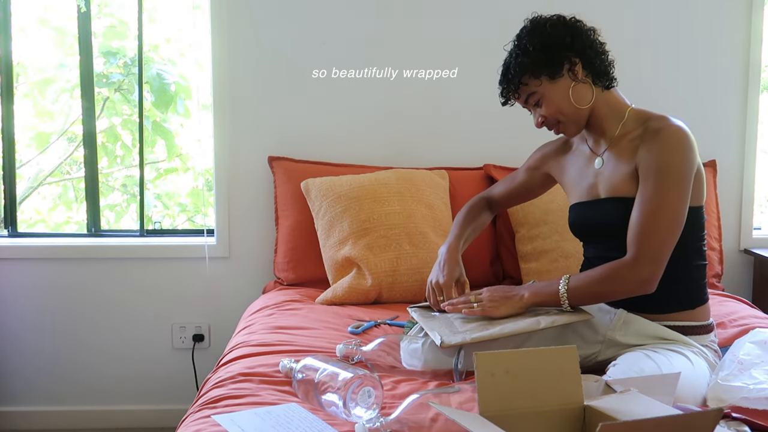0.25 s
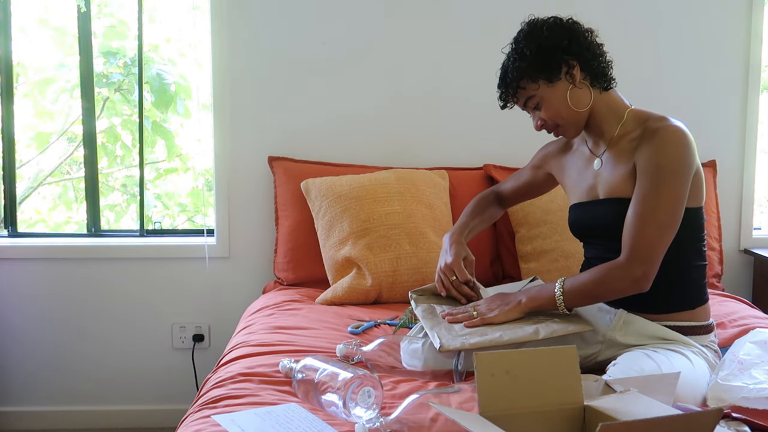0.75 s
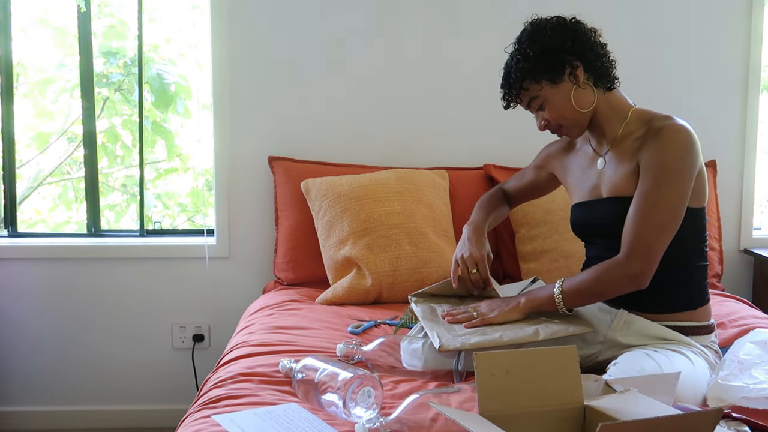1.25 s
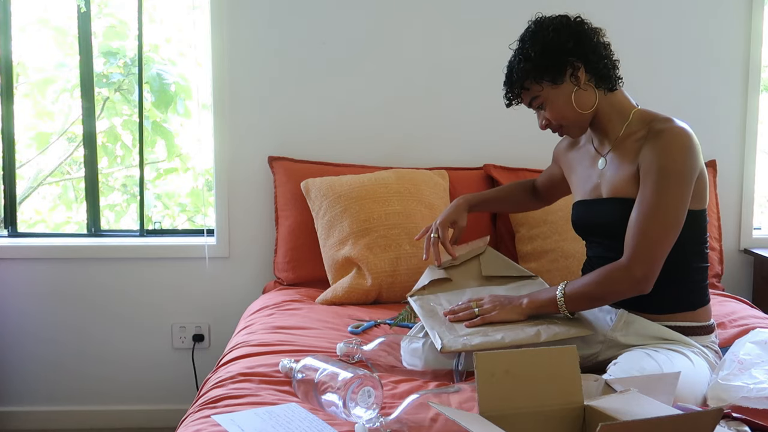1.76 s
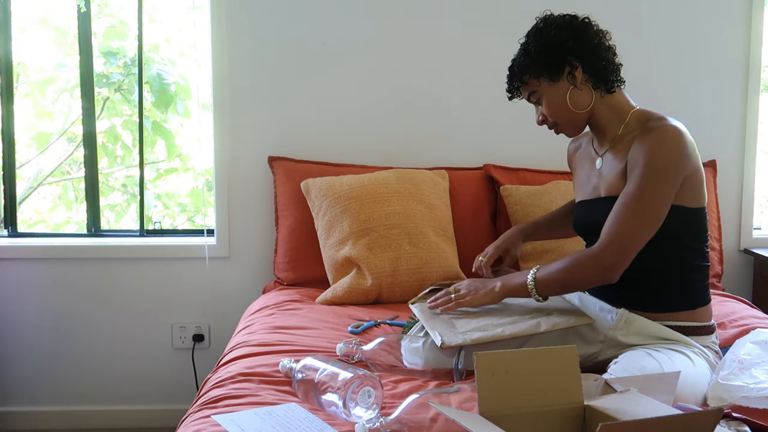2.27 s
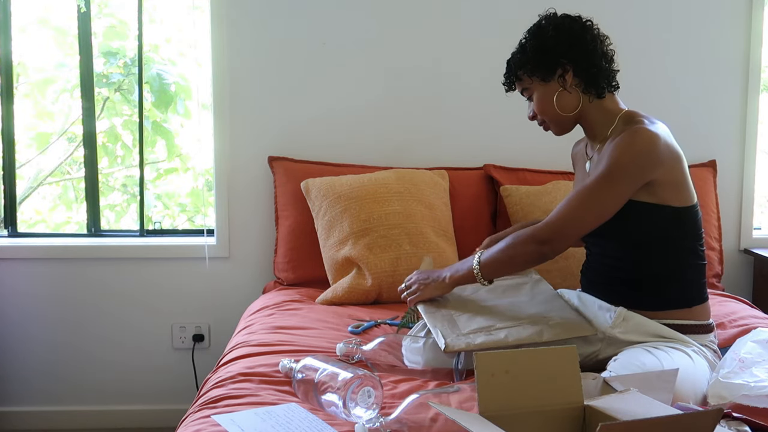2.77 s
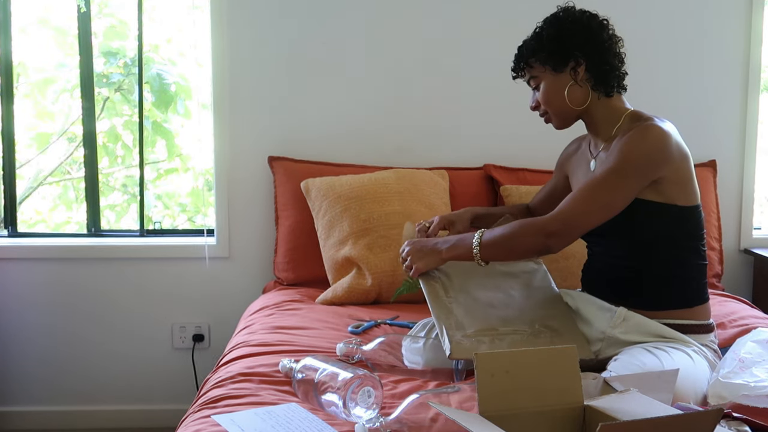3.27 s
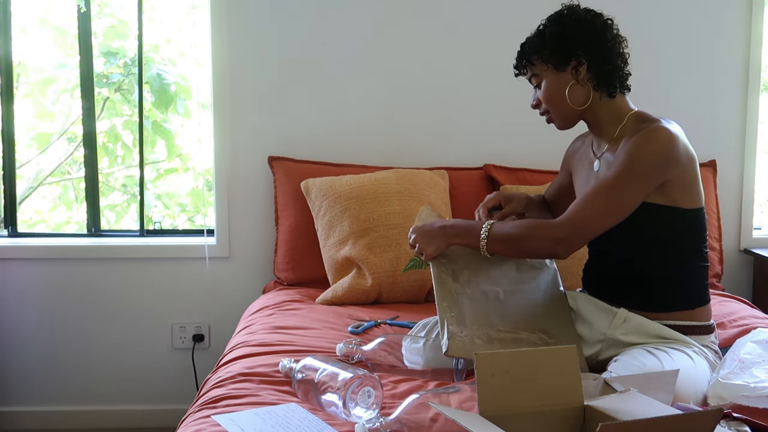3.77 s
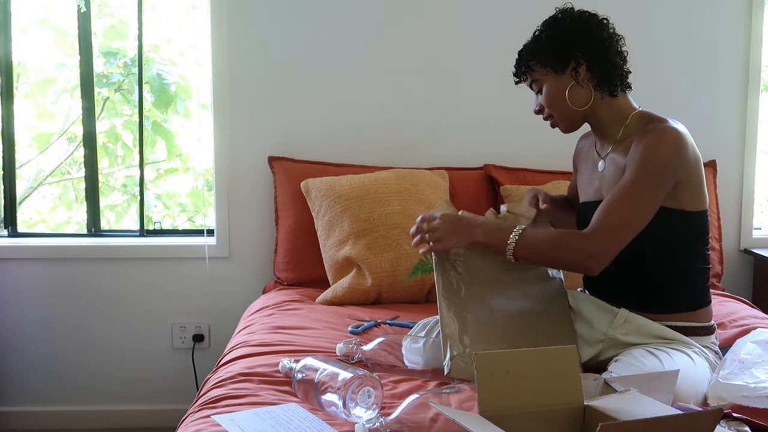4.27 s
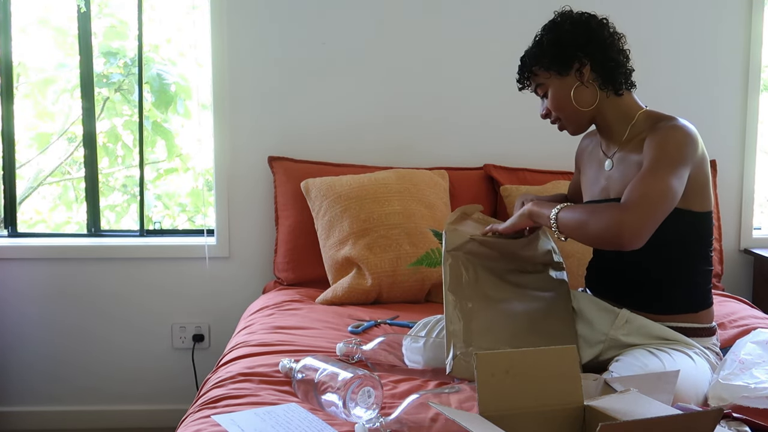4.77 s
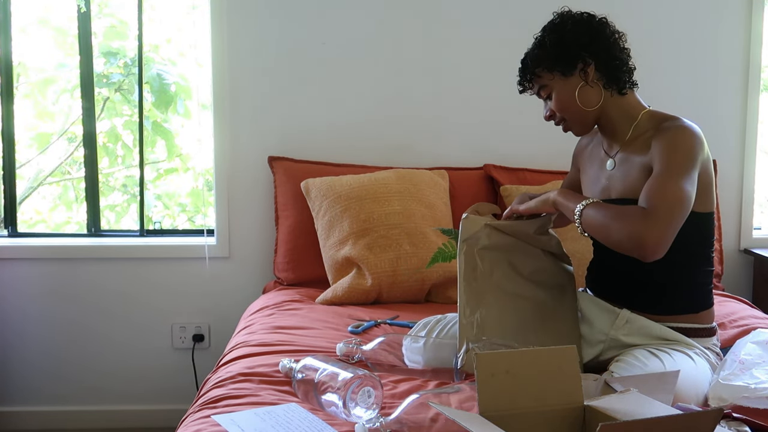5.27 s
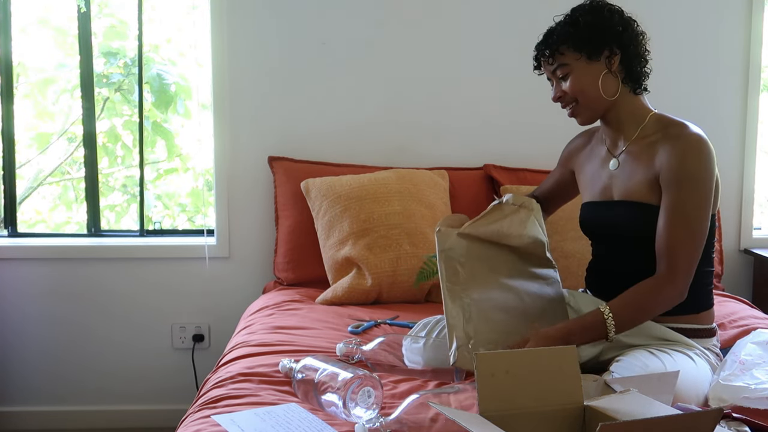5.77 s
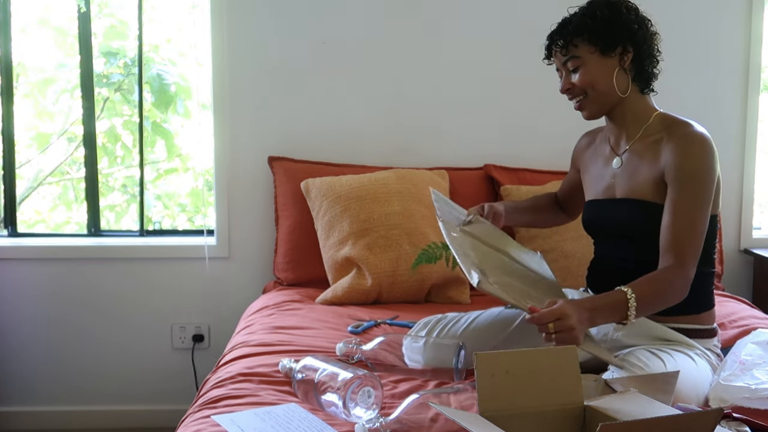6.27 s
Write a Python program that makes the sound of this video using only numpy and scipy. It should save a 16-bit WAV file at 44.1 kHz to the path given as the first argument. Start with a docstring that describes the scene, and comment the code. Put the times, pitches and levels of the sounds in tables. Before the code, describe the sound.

A heavy paper parcel is handled close by: dull pressing, sharp crease snaps, soft flaps and hollow thumps, with a faint room hum.

```python
"""Hands unwrap a parcel of thick paper on a bed in a small bare-walled bedroom with a faint hum.
First a dull pressing rumble under sliding paper and snapping creases; from 1.35 s hollow notes and flaps.
A sparser stretch from 2 to 3.4 s, then dense creasing to 5.3 s with one squeak at 4.7 s; last stroke at 6.2 s.
Paper is swarms of short rings, bending is noise pops, notes are wavering sines, the room is noise echoes."""
import sys
import numpy as np
from scipy import signal
from scipy.fft import rfft, irfft
from scipy.io import wavfile
from scipy.ndimage import uniform_filter1d

SR = 44100
rng = np.random.default_rng(int(sys.argv[2]) if len(sys.argv) > 2 else 0)


def wav_record(signal):
    """Record a signal, one row per channel, as 16-bit PCM in the file named by sys.argv[1]."""
    frames = np.transpose(np.atleast_2d(signal))
    bounded = np.clip(frames, -1, 1)
    # unit amplitude maps onto the largest positive 16-bit level
    quanta = np.round(bounded * 32767).astype(np.int16)
    wavfile.write(sys.argv[1], SR, quanta)


N = 287946
TIME = np.arange(N) / SR

# clearest single creases giving way:
# [t/s, level/dB, ring f/Hz, small snaps that follow re level/dB, treble tick before trim/dB]
CREASE_SNAPS = [(0.01, -21, 1870, -13, -36), (0.1498, -15.5, 2380, -6.5, -28), (0.218, -34, 2430, -13, -50),
                (0.2427, -16.5, 3120, -7.5, -40), (.3546, -29, 1660, -5, -48), (.422, -22, 1980, -5, -46),
                (.471, -14.5, 2200, -15, -48), (.52, -16.5, 2540, -1, -39),
                (0.5475, -15.5, 2070, -1.5, -36), (0.6948, -13.5, 1550, -13, -37),
                (.718, -11, 1700, -14, -43), (.784, -17, 1900, -12, -46), (0.843, -12, 4200, -7, -44),
                (0.8947, -19, 2560, -11, -44), (0.9796, -9, 2350, -13, -36), (.993, -13, 2010, -6, -36),
                (1.016, -14, 1900, -11, -44), (1.061, -8, 3000, -14.5, -52), (1.182, -12.5, 3270, -7, -53),
                (1.1852, -14, 2340, -8.5, -52), (1.321, -16, 2040, -15, -47), (1.4689, -9, 2060, 2, -27),
                (1.478, -1.5, 2100, -14, -42), (1.6345, -13.5, 2700, -11, -50),
                (1.657, -10, 1830, -7.5, -49), (1.801, -22, 1940, -8, -48), (2.064, -20.5, 2560, -20, -60),
                (2.1595, -27, 2800, -13, -53), (2.223, -16, 2800, -8.5, -50), (2.252, -19, 2100, -15, -50),
                (2.4044, -20, 2660, -15, -52), (2.489, -24, 2500, -2, -48), (2.5633, -20, 3000, -7, -48),
                (2.6913, -25, 3020, -8, -50), (2.8855, -23, 2260, -9, -55), (3.016, -27, 1830, -6, -50),
                (3.407, -25, 2540, -5, -28), (3.4839, -13.5, 2100, -17, -50),
                (3.5513, -19.5, 1850, -1.5, -44), (3.605, -12, 2830, -4, -47), (3.633, -10, 2280, -7, -49),
                (3.7266, -11, 3000, -4, -35), (3.8048, -16, 1930, -7, -46), (3.9531, -7.5, 3080, -8, -39),
                (4.0444, -12.5, 3230, -9, -53), (4.1084, -9, 3020, -7, -46), (4.292, -3, 2840, -19, -24),
                (4.2986, -7.5, 3300, -4, -30), (4.324, -8, 3140, -5, -44), (4.341, -7, 2880, -7, -42),
                (4.512, -19, 2340, 0.5, -46), (4.584, -10.5, 1500, -6, -35), (4.5949, -9, 1900, -7, -33),
                (4.8018, -11.5, 2280, -2, -25), (4.867, -8, 3230, -5, -44), (4.8876, -3, 2100, -7.5, -35),
                (4.919, -8, 2510, -13, -40), (4.967, -15, 2210, -4, -50), (4.984, -10, 2400, -11, -44),
                (4.994, -12, 2550, -9, -44), (5.008, -8, 2640, -15, -41), (5.02, -8.5, 1340, -7, -46),
                (5.205, -14.5, 2030, -21, -52), (5.247, -15, 1730, -12, -58), (5.288, -5, 2640, -15, -38),
                (5.46, -20.5, 2190, 4, -30), (5.549, -21, 2900, 0.5, -48), (5.589, -18, 2560, -19, -50),
                (5.774, -23, 2310, -10, -54), (5.883, -22.5, 2190, -6, -55), (5.952, -18, 2400, -9, -49),
                (6.023, -19.5, 2810, -7, -40), (6.232, -10.5, 2290, -8, -40), (6.507, -25, 4550, -5, -43)]
# spectrum of creasing, relative: [f/Hz, level/dB per Hz]
CREASE_SPECTRUM = [(300, -18), (700, -13), (1200, -7), (1700, -5.5), (2400, -0.5), (3200, -2), (4500, -5),
                   (6500, -9.5), (9000, -17), (12500, -24.5), (15500, -60)]


def amp(db):
    """Decibels to gain."""
    return 10 ** (np.asarray(db) / 20)


def unit(x):
    """Scales to rms 1."""
    return x / np.sqrt(np.mean(x ** 2) + 1e-20)


def curve(rows, axis=1):
    """One column of a time table, interpolated at every sample."""
    rows = np.array(rows)
    return np.interp(TIME, rows[:, 0], rows[:, axis])


def read(points, hz):
    """A spectrum table, interpolated on a log-frequency axis."""
    f, value = np.transpose(points)
    return np.interp(np.log(hz + 1), np.log(f + 1), value)


def add(mix, s, sound):
    """Mixes a sound in, in place, at time s."""
    part = mix[max(round(s * SR), 0):][:len(sound)]
    part += sound[:len(part)]


def lowpass_noise(hz, size):
    """Random wander of rms 1, low-passed at hz."""
    sos = signal.butter(2, hz, fs=SR, output="sos")
    return unit(signal.sosfilt(sos, rng.standard_normal(size)))


def colour(x, spectrum, size=4096):
    """Causal minimum-phase filter of unit energy with the given spectrum."""
    hz = abs(np.fft.fftfreq(size, 1 / SR))
    log_gain = np.log(amp(read(spectrum, hz)))
    response = np.exp(np.conj(signal.hilbert(log_gain)))
    taps = np.fft.ifft(response).real[:size // 2]
    return signal.oaconvolve(x, taps / np.linalg.norm(taps))[:len(x)]


def shelf(x, hz, db):
    """Changes the level above hz by a curve of dB."""
    top = signal.sosfiltfilt(signal.butter(2, hz, "high", fs=SR, output="sos"), x)
    return x + top * (amp(db) - 1)


def effort(lead_s=0):
    """Gains of crinkle, treble and bending: strokes build, hold and let go on top of a steady rustle."""
    # each push, pull or fold: [t at full strength before lead/s, build-up/s, hold/s, let-go/s,
    # crinkle/dB, treble re crinkle/dB, bending/dB]
    strokes = [(0.005, 0.012, 0.03, 0.035, -30, -16.5, -46), (0.156, .008, .005, 0.036, -34.5, -14, -58),
               (0.244, 0.023, .005, 0.041, -39.5, -11, -68),
               (0.363, 0.0076, 0.0054, 0.024, -35.5, -16, -55),
               (0.435, 0.017, 0.026, 0.02, -29.5, -16.5, -45.5),
               (0.559, 0.034, 0.023, 0.051, -28.5, -17, -48), (0.702, 0.022, 0.056, 0.15, -30, -13.5, -44),
               (0.978, 0.16, 0.028, 0.027, -28, -16, -40.5), (1.325, 0.028, 0.11, 0.048, -28, -13, -44),
               (1.463, 0.023, 0.015, 0.018, -25, -6, -31.5),
               (1.671, 0.016, 0.015, 0.041, -36, -11.5, -34.5),
               (1.849, 0.022, 0.023, 0.027, -41, -13.5, -42), (2.072, .008, .005, 0.025, -43.5, -25, -62),
               (2.166, 0.0034, .003, 0.023, -37.5, -25, -60),
               (2.226, 0.0045, 0.06, 0.084, -35.5, -11.5, -44),
               (2.363, .008, .012, 0.027, -38.5, -7.5, -58), (2.493, 0.0088, .016, 0.045, -40, -9, -44),
               (2.567, .006, .045, 0.075, -37, -12.5, -45), (2.696, .008, 0.013, 0.025, -37.5, -8.5, -45),
               (2.748, .008, 0.0088, 0.012, -37.5, -14, -57), (3.036, 0.013, 0.016, 0.17, -37, -12, -45.5),
               (3.347, 0.024, 0.011, 0.015, -44.5, -2, -43), (3.471, 0.033, 0.0089, 0.014, -28, -12, -40),
               (3.61, 0.053, 0.018, 0.025, -29.5, -12.5, -36.5),
               (3.726, 0.004, 0.004, 0.013, -33.5, 3.5, -38),
               (3.847, 0.12, 0.013, 0.045, -26.5, -10, -34.5),
               (3.956, 0.039, .005, 0.042, -26.5, -12.5, -38.5), (4.1, 0.047, 0.014, 0.046, -31, -14, -55),
               (4.206, 0.029, 0.0046, 0.022, -30.5, -16.5, -36),
               (4.293, 0.0073, 0.047, 0.056, -31, -25, -33), (4.381, 0.028, 0.015, 0.019, -25, -13.5, -35),
               (4.591, 0.0092, 0.02, 0.033, -26.5, -18, -35), (4.703, .025, 0.021, 0.1, -32, -11.5, -40.5),
               (4.805, 0.026, 0.013, 0.025, -25, -12.5, -31),
               (4.896, 0.014, 0.014, 0.039, -24.5, -9.5, -29.5),
               (5.013, 0.029, 0.0063, 0.027, -20.5, -14, -30.5),
               (5.116, 0.029, 0.029, 0.071, -35, -10, -40), (5.286, 0.011, 0.015, 0.042, -26, -9, -39),
               (5.446, 0.018, .015, 0.042, -34, -24, -43), (5.633, 0.065, 0.019, 0.044, -34, -11.5, -42.5),
               (5.878, .004, .004, 0.013, -52, -18, -47), (5.984, 0.024, 0.055, 0.037, -38, -10, -56),
               (6.212, 0.034, 0.017, 0.091, -22.5, -15, -35)]
    # parcel held and turned between strokes: [t/s, crinkle/dB, bending/dB]
    holding = [(0, -41, -51), (.33, -45.5, -65), (.52, -54, -58), (1.05, -38.5, -43.5), (1.25, -39, -50),
               (1.55, -35.5, -49), (1.62, -39.5, -45.5), (1.79, -43, -54), (2.12, -55, -56.5),
               (2.5, -41, -51), (2.86, -48, -54.5), (3.17, -38.5, -47), (4.0, -36, -45), (4.5, -35.5, -44),
               (5.05, -36, -42.5), (5.7, -36, -44), (5.93, -51, -55.5), (6.3, -56, -56), (6.53, -38, -54)]
    holding_treble_db = -15  # re crinkle

    crinkle, bending = (amp(curve(holding, axis=k)) ** 2 for k in (1, 2))
    treble = crinkle * amp(holding_treble_db) ** 2
    t = TIME + lead_s
    for s, build_s, hold_s, let_go_s, db, sharp_db, bend_db in strokes:
        before = np.maximum(s - t, 0) / build_s
        after = np.maximum(t - s - hold_s, 0) / let_go_s
        power = np.exp(-2 * np.minimum(before + after, 20))
        crinkle = crinkle + power * amp(db) ** 2
        treble = treble + power * amp(db + sharp_db) ** 2
        bending = bending + power * amp(bend_db) ** 2
    return np.sqrt([crinkle, treble, bending])


def ring(hz, cycles, size=500):
    """A facet of paper swells within a cycle, then decays by 1/e every `cycles` cycles."""
    turns = hz * np.arange(size) / SR
    return np.sin(2 * np.pi * turns) * np.exp(-turns / cycles) * (1 - np.exp(-2 * turns))


def clumps(spread_db, per_s):
    """Random gain: snaps come in little avalanches."""
    return amp(spread_db * lowpass_noise(per_s, N))


def crackle(per_s, spread_db, cycles, wander_db, wander_per_s, count=36, order=4):
    """A white swarm of snaps, many small and few large, on facets that get busy in groups of like size."""
    sizes = amp(spread_db * np.minimum(rng.exponential(1, N), 3.6)) * rng.choice([-1, 1], N)
    clicks = sizes * (rng.random(N) < per_s / SR)
    facet = rng.integers(0, count, N)
    busy = [clumps(wander_db, wander_per_s) for _ in range(count // order)]
    out = np.zeros(N)
    for k, hz in enumerate(np.geomspace(500, 15000, count)):
        struck = clicks * (facet == k) * busy[k // order]
        out += signal.oaconvolve(struck, ring(hz, cycles) * hz)[:N]
    # evens out the swarm's level over about 40 ms, so no random burst sticks out
    power = uniform_filter1d(uniform_filter1d(out ** 2, size=1500), size=700)
    return out / np.sqrt(abs(power) + 0.0011 * power.mean())


def sticking(depth_db, hold_s):
    """Gain dip just before a crease gives way, as the paper holds still under tension."""
    held = np.zeros(N)
    for s, *_ in CREASE_SNAPS:
        held = np.maximum(held, np.exp(-abs(s - TIME) / hold_s) * (TIME < s))
    return amp(depth_db * held)


def rustle(crinkle, treble, crease_db, slide_db, treble_db):
    """Coarse creasing and fine sliding share the work; taut paper and tight creases are brighter."""
    # paper sliding flat on paper rather than creasing: [t/s, power share 0-1]
    slide_share = [(0, 0.65), (.25, 0.06), (.45, 0.56), (.75, 0.75), (1.0, 0.9), (1.2, 0.48), (1.4, 0.16),
                   (2.1, 0.24), (4.4, 0.12), (4.7, 0.26), (5.4, 0.08), (5.9, 0.15), (6.2, 0.18),
                   (6.5, 0.12)]
    # tension in the sheet: [t/s, treble re bass/dB]
    tension = [(0, 0), (.7, 1), (1.2, 1.5), (1.47, -2), (1.6, -5.5), (2.1, 4), (2.35, 1), (3.1, 1),
               (3.8, -1.5), (4.35, -0.5), (4.7, -2), (5.3, -2), (5.8, -3.5), (6.0, -4), (6.25, 3),
               (6.53, 7)]
    # relative: [f/Hz, level/dB per Hz]
    slide_spectrum = [(300, -16), (800, -15), (1150, -5), (1450, 2), (2000, 2), (2800, -2.5), (4000, -5.5),
                      (6500, -9.5), (10000, -13.5), (13000, -23), (15500, -43)]

    share = np.clip(curve(slide_share), 0.01, .99)
    tension_db = curve(tension)

    coarse = crackle(per_s=4200, spread_db=4.5, cycles=1.2, wander_db=1.5, wander_per_s=17.4)
    creasing = amp(crease_db) * colour(coarse, CREASE_SPECTRUM) * clumps(spread_db=1.0, per_s=75)
    fine = crackle(per_s=4200, spread_db=2.0, cycles=1.9, wander_db=1.36, wander_per_s=29)
    sliding = amp(slide_db) * colour(fine, slide_spectrum)

    paper = np.sqrt(1 - share) * creasing + np.sqrt(share) * sliding
    paper = shelf(paper, hz=2800, db=tension_db) / amp(tension_db / 2)
    paper = shelf(paper, hz=5300, db=20 * np.log10(treble / crinkle) + treble_db)
    return crinkle * paper * sticking(depth_db=-1.0, hold_s=0.043)


def snaps(level_db, cycles, fibres_db, fibres_s, run_s, follow_per_s, size=2600):
    """A crease gives way: short ring, fizz of fibres and a run of smaller snaps."""
    out, t = np.zeros(N), np.arange(size) / SR
    highpass = signal.butter(2, 7000, "high", fs=SR, output="sos")
    for s, db, hz, follow_db, tick_db in CREASE_SNAPS:
        clicks = rng.choice([-1, 1], size) * (rng.random(size) < follow_per_s / SR)
        run = clicks * 2 * t / run_s * np.exp(-t / run_s)
        fizz = signal.sosfilt(highpass, rng.standard_normal(size))
        fibres = fizz * t / fibres_s * np.exp(-t / fibres_s)
        add(out, s, amp(db + level_db) * ring(hz, cycles, size=size) + amp(tick_db + fibres_db) * fibres)
        add(out, s, amp(db + follow_db) * colour(run, CREASE_SPECTRUM))
    return out


def flexing(bending, per_s):
    """Broad panels pop softly as the sheet bends: sparse random impulses."""
    return unit(rng.standard_normal(N) * (rng.random(N) < per_s / SR)) * bending


def flaps(level_db, size=1500):
    """The sheet flaps or is patted: one short push and pull of air."""
    # [t/s, level before trim/dB, push time constant/s]
    flap_rows = [(1.464, -38, 0.0015), (1.654, -57, 0.00042), (2.224, -39.5, 0.0017), (3.831, -38, .001),
                 (4.315, -46, .001), (4.585, -37, 0.0022), (4.797, -29.5, 0.0015), (4.886, -29, 0.00056),
                 (5.014, -45, 0.00055)]
    out = np.zeros(N)
    for s, db, push_s in flap_rows:
        u = np.arange(size) / SR / push_s
        add(out, s, amp(db + level_db) * np.diff(u * np.exp(-u)) / u[1])
    return out


def sweeps(level_db, per_s):
    """A panel is dragged or swung through: a dense flutter of low pops swells and dies."""
    # [t at loudest/s, length/s, level before trim/dB]
    sweep_rows = [(.565, .07, -49), (0.817, 0.23, -42), (1.363, 0.062, -32.5), (1.422, .06, -33.5),
                  (2.262, 0.079, -37.5), (2.63, 0.21, -46), (2.745, .08, -57), (3.04, 0.046, -43),
                  (3.238, .17, -45.5), (3.361, 0.041, -41), (3.636, 0.054, -45), (3.973, 0.043, -46),
                  (4.39, 0.077, -41), (5.173, 0.045, -44), (5.41, 0.053, -53)]
    # relative: [f/Hz, level/dB per Hz]
    panel_spectrum = [(200, -29), (400, -7.5), (560, 2.5), (700, -4.5), (880, 0), (1150, -5.5), (1600, -18),
                      (4000, -49)]
    swell = np.zeros(N)
    for s, length_s, db in sweep_rows:
        swell += amp(db) * np.exp(-np.minimum((2 * (TIME - s) / length_s) ** 2, 30))
    return amp(level_db) * colour(flexing(swell, per_s), panel_spectrum)


def wavering_note(s, length_s, hz, db, waver, per_s, glide):
    """Start time and a short sine of unsteady pitch that swells and dies around s; glide is its relative rise."""
    u = np.arange(round(length_s * SR)) / (length_s * SR)
    wander = lowpass_noise(per_s, SR)[-len(u):]
    turns = np.cumsum(hz * (1 + glide * (u - .5) + waver * wander)) / SR
    return s - length_s / 2, amp(db) * np.sin(np.pi * u) * np.sin(2 * np.pi * turns)


def hollows(level_db):
    """Air inside the squeezed parcel answers with short hollow notes, pitched by its shape."""
    # [t at loudest/s, length/s, mean f/Hz, level before trim/dB]
    hollow_rows = [(1.354, 0.051, 346, -37.5), (1.401, .03, 331, -37), (1.449, 0.027, 405, -41),
                   (2.731, .07, 386.5, -45), (3.049, 0.068, 557, -44), (3.616, 0.08, 396, -36.5),
                   (4.215, 0.032, 368, -37), (4.407, 0.055, 321, -38), (4.521, .025, 550, -38),
                   (4.597, 0.045, 305, -33.5), (4.752, 0.062, 303.5, -34.5), (4.807, 0.037, 325, -30.5),
                   (5.113, 0.046, 290, -41), (5.298, 0.054, 409, -39)]
    out = np.zeros(N)
    for row in hollow_rows:
        add(out, *wavering_note(*row, waver=0.1, per_s=180, glide=0))
    return amp(level_db) * out


def squeak():
    """Paper squeaks on paper: one short, rough, slightly rising note."""
    out = np.zeros(N)
    add(out, *wavering_note(s=4.708, length_s=.055, hz=2060, db=-31.5, waver=0.057, per_s=410, glide=0.063))
    return out


def pressing(top_hz):
    """Hands press the parcel into the lap: band-passed noise, a dull rumble with no treble."""
    # [t/s, level/dB]
    press_level = [(0, -75), (.09, -66), (.125, -42.5), (.17, -44.5), (.195, -41), (.24, -45), (.3, -52),
                   (.4, -52), (.45, -50.5), (.52, -52), (.65, -54), (.9, -84)]
    sos = signal.butter(2, [25, top_hz], "band", fs=SR, output="sos")
    return amp(curve(press_level)) * unit(signal.sosfilt(sos, rng.standard_normal(N)))


def wall_scatter(wet_db, size=20000, count=1000):
    """Dense reflections of random sign, each band dying at its own speed."""
    # [f/Hz, decay time to -60 dB/s]
    decay_t60 = [(100, 1), (400, 0.31), (2000, 0.38), (6000, 0.33), (14000, 0.095)]
    taps, step = np.zeros(size), size // count
    places = np.arange(count) * step + rng.integers(0, step, count)
    taps[places] = rng.choice([-1, 1], count)
    hz, t, z = signal.stft(taps, SR, nperseg=256)
    decay = amp(-60 * t / read(decay_t60, hz)[:, None])
    tail = signal.istft(z * decay, SR, nperseg=256)[1][:size]
    tail *= np.clip(np.arange(size) / SR / 0.0058 - .3, 0, 1)  # delayed fade-in
    return amp(wet_db) * tail / np.linalg.norm(tail)


def bedroom(x, wet_db, drift_hz, count=7):
    """First echoes and tail; random responses crossfade in a fixed cycle, so no single one colours the room."""
    # first echoes: [delay before +-20 % scatter/s, gain before random sign]
    first_echoes = [(.0031, 0.66), (.0076, 0.28)]
    out = np.zeros(N)
    for k in range(count):
        response = wall_scatter(wet_db)
        for delay_s, gain in first_echoes:
            add(response, delay_s * rng.uniform(.8, 1.2), gain * rng.choice([-1, 1], 1))
        away = abs((drift_hz * TIME * count - k) % count - count / 2)
        here = np.cos(np.pi / 2 * np.minimum(away, 1))
        out += signal.oaconvolve(x * here, response)[:N]
    return out


def room_modes(x, size=16000):
    """The room's low standing waves: decaying cosines, together of unit energy."""
    # [f/Hz, relative level/dB, decay time to -60 dB/s]
    mode_rows = [(87, -5, 0.3), (119.5, -2.5, 0.35), (166, -5.5, 0.45), (322, -6.5, 0.18),
                 (362.6, 0.5, 0.22), (409, 1.5, 0.23), (560, 3, 0.17), (790, 3.5, 0.072), (902, -1, 0.47)]
    t = np.arange(size) / SR
    body = np.zeros(size)
    for hz, db, t60_s in mode_rows:
        body += amp(db - 60 * t / t60_s) * np.cos(2 * np.pi * hz * t)
    return signal.oaconvolve(x, body / np.linalg.norm(body))[:N]


def room_tone(air_db, hum_hz, hum_db):
    """Still air as coloured noise, and a faint hum of wandering phase."""
    # relative: [f/Hz, level/dB per Hz]
    air_spectrum = [(20, -10), (60, -5.5), (120, -10), (200, -17.5), (400, -10.5), (1000, -27), (3000, -34),
                    (8000, -42), (15000, -70)]
    hum = np.sin(2 * np.pi * hum_hz * TIME + lowpass_noise(5, N))
    return amp(air_db) * colour(rng.standard_normal(N), air_spectrum) + amp(hum_db) * hum


def scene():
    """Paper in the room, in stereo: mid plus and minus a side signal whose echoes are widest in the treble."""
    # bending sheet, relative: [f/Hz, level/dB per Hz]
    sheet_spectrum = [(25, -41), (80, -13.5), (160, -3.5), (240, -5.5), (310, 2), (400, -5), (540, -3.5),
                      (700, -3.5), (1100, -8), (1800, -23), (4000, -57)]
    # gain of the side echoes: [f/Hz, gain/dB]
    side_gain = [(50, -37), (150, -39), (1200, -17.5), (2200, -21), (3200, -10.5), (4500, -3.5), (7000, 2),
                 (10000, 8.5), (14000, 17.5)]
    # still air in the side signal, relative: [f/Hz, level/dB per Hz]
    side_air_spectrum = [(30, -34), (150, -2), (400, 2), (1000, -5.5), (3000, -10.5), (8000, -18),
                         (15000, -26)]

    crinkle, treble, bending = effort(lead_s=0.0045)
    pops = flexing(bending, per_s=1200)
    paper = rustle(crinkle, treble, crease_db=-5.0, slide_db=-2.5, treble_db=8.5)
    paper += amp(-6.0) * colour(pops, sheet_spectrum)
    paper += snaps(level_db=0.0, cycles=1.27, fibres_db=-4.0, fibres_s=0.0019, run_s=0.0042,
                   follow_per_s=2500)
    paper += squeak() + hollows(level_db=1.0) + sweeps(level_db=-6.0, per_s=2500)

    echoes, side = (bedroom(paper, wet_db=-4.5, drift_hz=4.5) for _ in range(2))
    mid = paper + echoes + room_modes(amp(-7.0) * pops + flaps(level_db=5.0))
    mid += room_tone(air_db=-55.5, hum_hz=116.0, hum_db=-59.0) + pressing(top_hz=126)

    # paper is straight ahead: only echoes and still air differ between channels
    side = irfft(rfft(side) * amp(read(side_gain, np.fft.rfftfreq(N, 1 / SR))), N)
    side += amp(-58) * colour(rng.standard_normal(N), side_air_spectrum)
    return np.array([mid + side, mid - side]) * amp([[-.15], [.15]])  # channel balance


def record(dry):
    """Band limit: steep linear-phase low-pass at 15.6 kHz."""
    taps = signal.firwin(511, 15600, window=("kaiser", 9), fs=SR)
    return signal.oaconvolve(dry, taps[None], "same")


dry = scene()
out = record(dry)
wav_record(out)
```